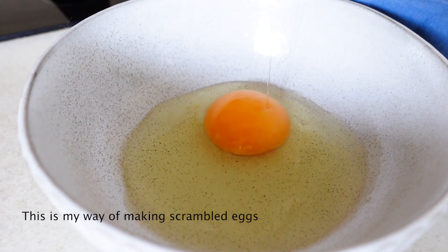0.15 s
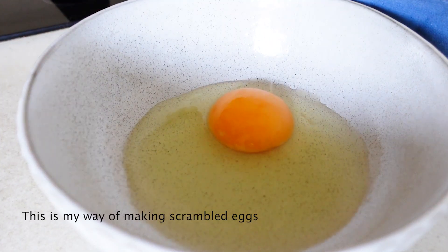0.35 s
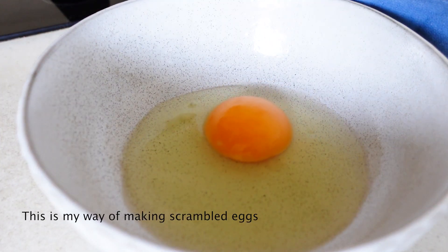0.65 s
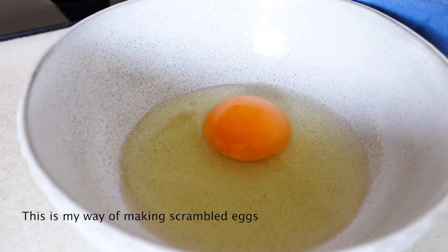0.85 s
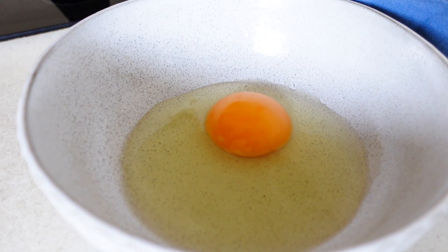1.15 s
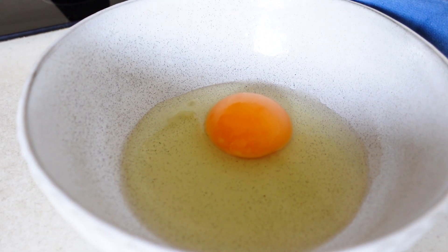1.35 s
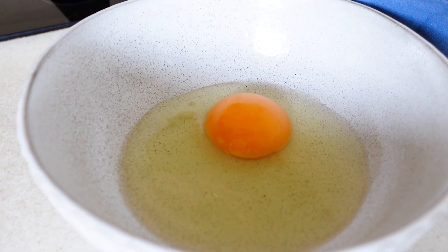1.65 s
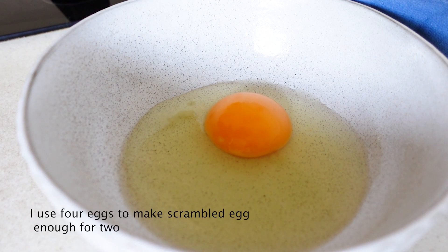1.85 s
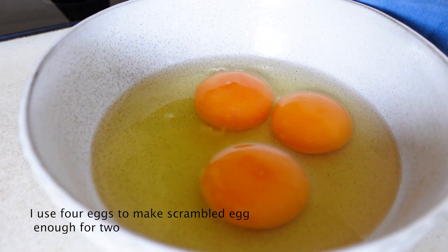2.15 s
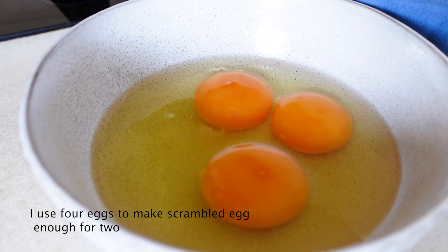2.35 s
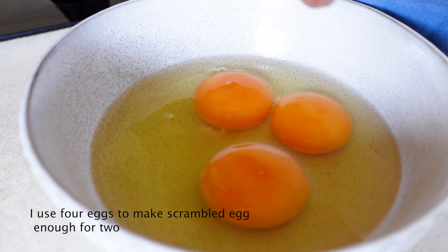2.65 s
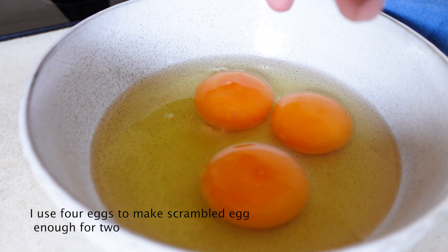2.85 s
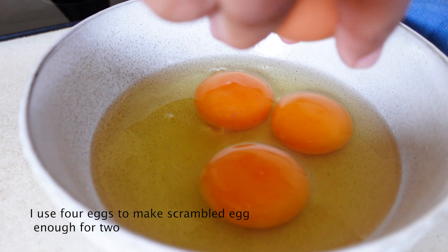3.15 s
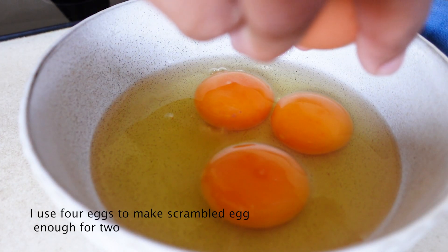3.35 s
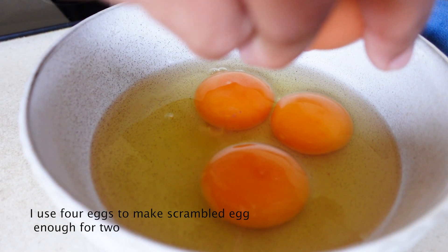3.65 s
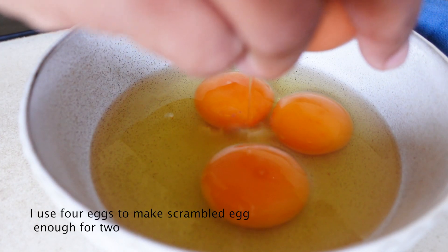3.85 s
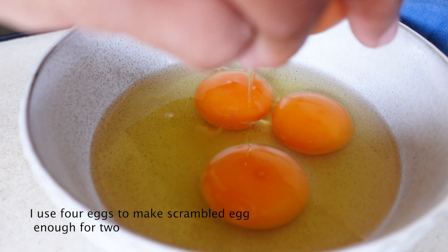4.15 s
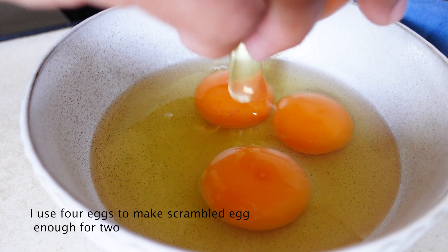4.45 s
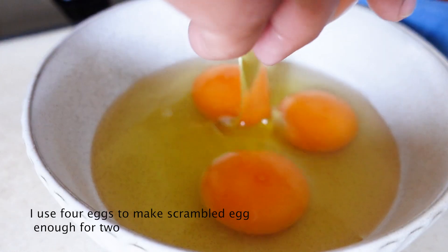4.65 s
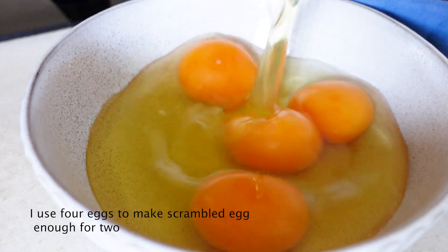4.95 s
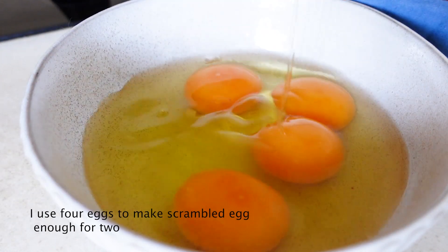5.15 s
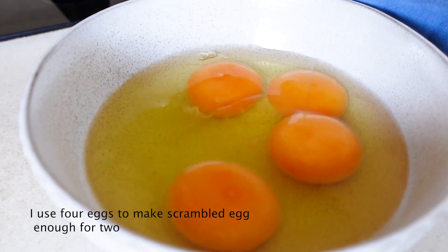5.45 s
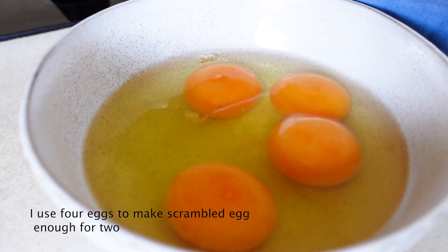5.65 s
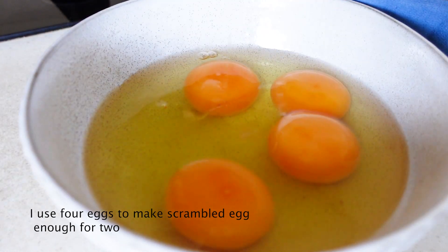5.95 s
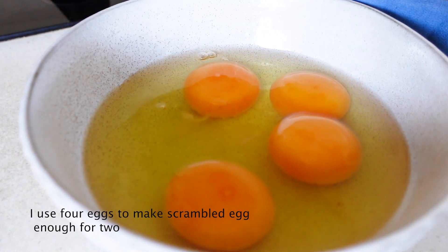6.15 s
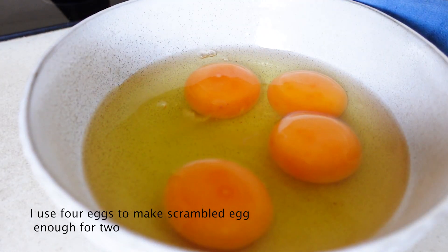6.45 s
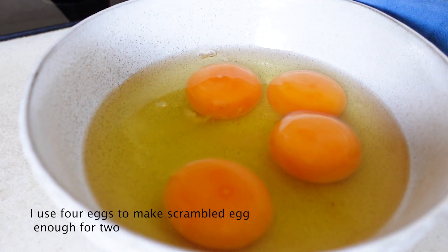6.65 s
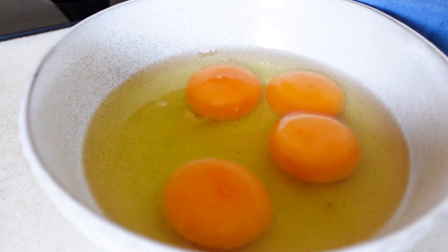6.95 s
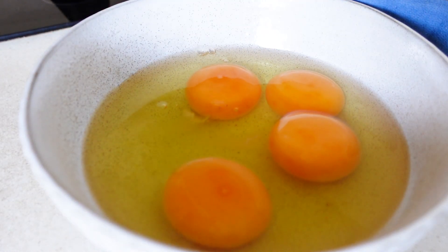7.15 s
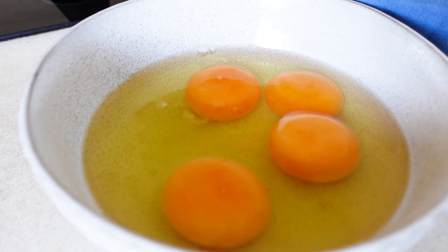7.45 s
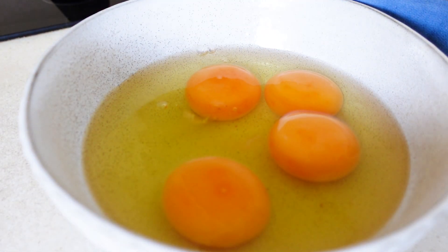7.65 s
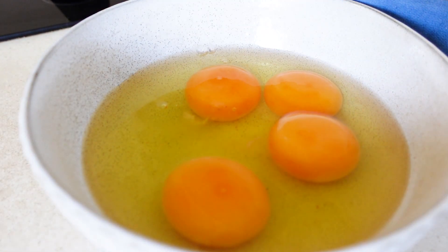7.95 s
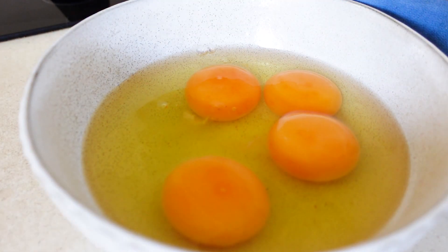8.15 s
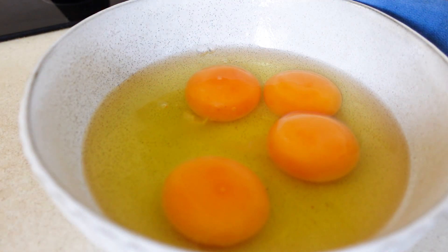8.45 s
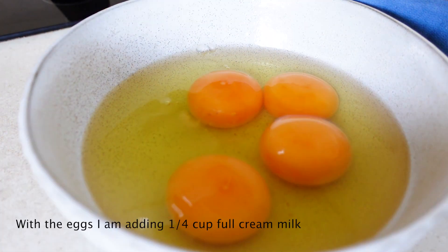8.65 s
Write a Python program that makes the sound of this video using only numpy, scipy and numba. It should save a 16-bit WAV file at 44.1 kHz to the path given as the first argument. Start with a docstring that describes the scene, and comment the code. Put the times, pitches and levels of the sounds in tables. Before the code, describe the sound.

Close eggshell handling in a kitchen with short, light reflections. From 0 s, crisp small cracks and splintery ticks arrive irregularly, growing to strong hollow crunches near 0.85-1.0 s and a denser crackling squeeze around 1.35-1.6 s. From about 1.7 to 3.1 s it is mostly soft rustle and a few faint ticks. A sharp cluster at 3.15 s begins the second bout: scattered snaps and dull taps, a hard crack at 4.1 s, then the loudest, hollowest crunches at 4.35-4.65 s. Smaller cracks follow from 5.0 s, with a bright, brittle flurry at 5.9-6.4 s. After 6.6 s the shell falls nearly silent; hands and sleeves rustle gently, with a dull brush near 8.2 s and a faint tick and swish at 8.44 s. Faint low appliance hum and airy noise run throughout, dropping abruptly much quieter at about 8.6 s.

```python
"""Eggshells cracked by hand

Eggshells are cracked and crushed close by in a kitchen: each crack is a noise burst that rings the hollow,
wall and splinters of the shell. Fine crackle made of tiny grains follows, and dull knocks are short taps.
Smooth noise makes hands and sleeves rustle; steady tones and narrow noise make an appliance hum over airy noise.
Near the end the rustle and the room's reflections stop, and the air and hum drop to a quieter level."""
import sys
import numpy as np
from scipy import signal
from scipy.io import wavfile
from scipy.ndimage import uniform_filter1d
from numba import njit

SR = 44100
rng = np.random.default_rng(int(sys.argv[2]) if len(sys.argv) > 2 else 0)


def dump(signal):
    """Clip the signal to [-1, 1] and save it as 16-bit WAV at the path in sys.argv[1]."""
    limited = np.clip(np.atleast_2d(signal).T, -1, 1)
    pcm = np.round(limited * 32767).astype(np.int16)
    wavfile.write(sys.argv[1], SR, pcm)


def linear_from_db(decibels):
    """Turn decibels (scalar or array-like) into linear amplitude factors; 0 gives 1."""
    return 10 ** (np.asarray(decibels, float) / 20)


N = 388080
TIME = np.arange(N) / SR
QUIET_S = 8.587  # from here on the background is quieter
LATE = TIME > QUIET_S


def rms_one(x):
    """Scale to rms 1."""
    return x / np.sqrt(np.mean(x ** 2) + 1e-20)


def at_hz(points, hz):
    """Read a table of (Hz, value) on a log-frequency axis."""
    table_hz, values = np.transpose(points)
    return np.interp(np.log(hz), np.log(table_hz), values)


def band(x, low_hz, high_hz, order=2):
    """Butterworth band-pass."""
    edges = [low_hz, min(high_hz, .45 * SR)]
    return signal.sosfilt(signal.butter(order, edges, "band", fs=SR, output="sos"), x)


def resonance(x, hz, width_hz):
    """Two-pole resonance with gain 1 on top."""
    r = np.exp(-np.pi * width_hz / SR)
    return signal.lfilter([1 - r * r, 0, r * r - 1], [1, -2 * r * np.cos(2 * np.pi * hz / SR), r * r], x) / 2


@njit
def moving_resonance(x, hz, r, sr):
    """Two-pole resonance whose centre follows hz and whose width follows r."""
    y = np.zeros(len(x))
    for n in range(2, len(x)):
        push = np.sqrt(1 - r[n]) * (x[n] - x[n - 2])
        y[n] = push + 2 * r[n] * np.cos(2 * np.pi * hz[n] / sr) * y[n - 1] - r[n] ** 2 * y[n - 2]
    return y


def grains(shape, per_s, spread_db):
    """Noise chopped into tiny fractures of uneven size that die within milliseconds; rms 1."""
    sizes = linear_from_db(spread_db * np.minimum(rng.exponential(1, shape), 4))
    sizes = sizes * (rng.random(shape) < per_s / SR)
    envelope = signal.lfilter([1], [1, -np.exp(-1 / (0.0019 * SR))], sizes + 1e-18)
    return rms_one(envelope * rng.standard_normal(shape))


def swells(rows):
    """Two gains from rows that each rise to a top and fall again, straight in dB; powers add."""
    power = np.zeros((2, N))
    for top_s, rise_s, fall_s, *db in rows:
        rising, falling = (top_s - TIME) / max(rise_s, 1e-3), (TIME - top_s) / max(fall_s, 1e-3)
        slope_db = -20 * np.where(TIME < top_s, rising, falling)
        power += linear_from_db(2 * np.maximum(slope_db, -99)) * linear_from_db(2 * np.array(db))[:, None]
    return np.sqrt(power)


def place(out, s, sound, db):
    """Mix a short sound in, its loudest 2 ms at the given level."""
    top = np.sqrt(uniform_filter1d(sound ** 2, size=88).max())
    start = round(s * SR)
    out[start:start + len(sound)] += sound * linear_from_db(db) / top


# How alike the noise is in both ears. Each row: frequency in Hz, left-right likeness from 0 to 1.
LIKENESS = [(60, 0.86), (180, 0.95), (550, 0.067), (3000, 0.4), (15000, 0.58)]


def stereo_noise(spectrum, drop):
    """Third-octave noise bands, each with its level, likeness and drop in the quiet end; overall rms 1."""
    out, edges = 0, 25 * 2 ** (np.arange(30) / 3)
    white = rng.standard_normal((2, 2, N))
    for k, (low, high) in enumerate(zip(edges, edges[1:])):
        mid, side = band(white[k % 2], low, high)
        hz = np.sqrt(low * high)
        alike = np.clip(at_hz(LIKENESS, hz), 0, 1)
        gain = linear_from_db(at_hz(spectrum, hz) + LATE * at_hz(drop, hz))
        out = out + gain * (np.sqrt(1 + alike) * mid + np.sqrt(1 - alike) * side * [[1], [-1]])
    return rms_one(out)


# Colour of the air noise. Each row: frequency in Hz, relative level in dB per Hz.
AIR = [(18, -42.5), (30, -25.5), (112, -5.5), (157, -2), (1100, -17.5), (1320, -17.5), (2680, -17.5),
       (3220, -22.5), (6550, -24.5), (16000, -29)]
# How the background changes in the quiet end. Each row: frequency in Hz, change in dB.
QUIET_DB = [(60, -19), (150, -12.5), (600, -25.5), (3000, -25.5), (12000, -28.5)]


def air():
    """Steady broad noise, strongest in the bass, quieter at the end."""
    return linear_from_db(-61.5) * stereo_noise(AIR, QUIET_DB)  # dB rms over the whole scene


# Two steady motor tones that beat: a list of pitches in Hz, then of levels in dB before the quiet end.
MOTORS_HZ = [100.4, 104.67]
MOTORS_DB = [-70, -65.5]
# Wavering appliance tones. Each row: pitch in Hz, width in Hz of one resonance, level in dB before the quiet end.
HUMS = [(83, 14, -75), (172.7, 20, -76), (2699, 5.6, -78), (2734, 5.3, -80)]


def hum():
    """Two steady motor tones, and narrow wavering ones: noise passed twice through a resonance."""
    out = 0
    for hz, db in zip(MOTORS_HZ, MOTORS_DB):
        tone = np.sin(2 * np.pi * hz * TIME)
        out = out + rms_one(tone) * linear_from_db(db + LATE * at_hz(QUIET_DB, hz))
    for hz, width_hz, db in HUMS:
        noise = rng.standard_normal(N + SR)
        tone = resonance(resonance(noise, hz, width_hz), hz, width_hz)[SR:]  # skip the build-up
        out = out + rms_one(tone) * linear_from_db(db + LATE * at_hz(QUIET_DB, hz))
    return out


# Each new grip gives the open shell another hollow and wall ring. Each row: start in seconds, hollow pitch in Hz,
# hollow width in Hz, wall ring pitch in Hz, gain of the wall ring in dB.
GRIPS = [(0, 2150, 320, 5870, -2), (.65, 1620, 220, 3400, -6), (.82, 1700, 300, 5200, -8),
         (.97, 1870, 450, 6200, -5), (1.15, 2250, 260, 5770, -2), (2.201, 2720, 300, 4500, -8.5),
         (3.351, 2750, 250, 4700, -4), (3.45, 1650, 400, 2750, 0), (3.5, 3040, 160, 5040, -8),
         (3.86, 2850, 220, 5000, -6), (4.05, 2500, 350, 4700, -8), (4.34, 2250, 450, 3700, -4),
         (4.39, 2010, 280, 3780, -2), (4.57, 1560, 260, 3500, 2), (4.75, 1450, 150, 3450, 3),
         (4.95, 1650, 300, 3520, 10), (5.021, 2120, 350, 3500, -7.5), (5.3, 1950, 500, 3500, -9),
         (6.04, 2800, 300, 4500, -6.5), (6.095, 2300, 400, 3700, -4), (6.351, 2030, 280, 5050, -2),
         (6.43, 1700, 300, 2500, -6)]


def grip(s):
    """Hollow Hz, its width Hz, wall ring Hz and wall ring dB of the grip held at these times."""
    start, *columns = np.transpose(GRIPS)
    return np.array(columns)[:, np.clip(np.searchsorted(start, s) - 1, 0, None)]


# Every crack of the shell. Each row: start in seconds, then the levels in dB of shell wall, hollow and splinters
# (loudest 2 ms, before the low cut and panning).
CRACKS = [(0.0285, -39, -32, -40), (0.0328, -38, -35, -27.5), (0.0641, -35, -33.5, -19.5),
          (0.0948, -49, -61, -33), (0.0992, -36.5, -33, -34.5), (0.1445, -49, -47.5, -38.5),
          (0.181, -35, -32.5, -32.5), (0.3037, -49, -53, -36.5), (0.324, -76.5, -51.5, -38),
          (0.3266, -49.5, -62, -45), (0.5416, -54, -46.5, -49), (0.56, -40, -44, -31.5),
          (0.5674, -43, -37.5, -33), (0.584, -56, -55, -46), (0.7128, -49, -35.5, -33.5),
          (0.729, -41.5, -39, -45.0), (0.754, -53.5, -41.5, -49), (0.7621, -54, -60.0, -41),
          (0.8272, -52, -46, -52.0), (0.8517, -33, -29.0, -29), (0.8662, -25, -25, -24.5),
          (0.9795, -29.5, -22.5, -27), (0.9856, -34, -26, -22.5), (0.992, -29, -40, -29),
          (1.1547, -53, -46, -61), (1.3412, -36.5, -30, -27.5), (1.363, -57.0, -34, -50.5),
          (1.383, -55, -35.5, -44), (1.4093, -38, -38, -35), (1.4147, -31.5, -38, -43),
          (1.4817, -60, -26.5, -44), (1.4987, -52, -29, -42), (1.5023, -38, -29.5, -28),
          (1.5744, -35, -37.5, -31.5), (1.6006, -34.5, -30, -28.5), (2.317, -58.5, -77.0, -51),
          (2.3465, -46, -57.5, -43.5), (2.9197, -57, -77, -42.5), (3.0039, -53, -63, -44),
          (3.0577, -51, -62, -50), (3.1438, -43, -49, -42), (3.157, -27, -32.5, -27.5),
          (3.1672, -35, -41, -27.5), (3.1726, -35, -42, -23.5), (3.181, -37, -34.5, -32),
          (3.1911, -28.5, -33.5, -32.5), (3.206, -50, -56, -32), (3.382, -39, -65, -37),
          (3.4136, -41.5, -43.5, -48), (3.4751, -47.5, -46, -46), (3.5125, -41, -50.0, -38),
          (3.684, -59, -60, -48), (3.7728, -46, -41.5, -31.5), (3.8067, -36, -37.5, -36),
          (3.8313, -49.0, -44.5, -40), (3.858, -51.0, -48.5, -44), (3.8688, -48, -43.5, -37),
          (3.8873, -29.5, -32.5, -28.5), (3.9309, -41, -44.5, -44), (3.9751, -45, -57.0, -42.5),
          (4.0818, -31, -34, -30), (4.0888, -24.5, -27, -18), (4.1268, -45, -43, -38),
          (4.2214, -45, -45, -43), (4.232, -39, -40, -36.5), (4.32, -33, -37, -35), (4.3647, -41, -40, -35),
          (4.371, -22.5, -20.0, -22), (4.38, -21, -20, -24), (4.395, -22, -26.5, -36),
          (4.4021, -20.5, -27, -23), (4.4304, -31, -35, -46), (4.5467, -34, -50, -37.5),
          (4.5915, -20.5, -29, -19.5), (4.6127, -38, -57, -44), (4.628, -32, -39, -37),
          (4.644, -16.5, -30.5, -21.5), (4.682, -43, -37, -44), (4.6944, -48.0, -40, -46.0),
          (4.7275, -43, -30.5, -57), (4.7806, -27.5, -28.5, -31.5), (4.816, -31.5, -34.5, -44),
          (4.989, -50, -55, -57.5), (5.0041, -27, -41.5, -32.5), (5.0351, -33.5, -37.5, -20.5),
          (5.0437, -52, -60, -49), (5.0986, -49.0, -63, -32.5), (5.1454, -50, -60, -41),
          (5.2177, -48, -46, -41), (5.2326, -46, -41, -36.0), (5.2571, -44, -36.5, -30.5),
          (5.2671, -37, -39, -28), (5.3834, -48, -47, -42), (5.4621, -54, -51, -44.5),
          (5.5267, -61.5, -48, -49.5), (5.6945, -59, -52, -41), (5.6991, -59, -46, -45),
          (5.7488, -55, -52.5, -47), (5.8431, -45, -40.5, -39.5), (5.8679, -55, -66, -45),
          (5.8921, -32.5, -35, -25.5), (5.9386, -39, -46, -28.5), (5.9564, -26.5, -30.5, -21),
          (5.9656, -36, -40, -24), (5.9848, -31, -46, -27.5), (6.0081, -41, -48.0, -34),
          (6.0613, -36.5, -41, -23.5), (6.077, -34.5, -37, -23.5), (6.104, -40, -48, -29.0),
          (6.1094, -53.0, -57.0, -43), (6.131, -50, -43, -37), (6.1515, -39, -41, -38),
          (6.1614, -41, -43.0, -21.5), (6.1851, -42.0, -55, -37.5), (6.1949, -42, -41, -23.5),
          (6.2113, -21, -28.5, -17.5), (6.2446, -46.0, -68, -30.5), (6.2564, -50.0, -66, -43),
          (6.3702, -40, -57, -38), (6.3803, -30, -26.5, -26), (6.3878, -30, -26.5, -27),
          (6.4052, -32.5, -43, -28.5), (6.4241, -37.5, -57, -32), (6.5382, -48.5, -39, -54),
          (6.5434, -54, -42, -55), (6.5675, -45, -61, -56), (6.802, -62, -55.5, -64),
          (8.442, -54, -75, -39)]


def cracks():
    """A sharp fracture and the crunch running on behind it ring the hollow and wall, over broad splintering."""
    burst_s, crunch_s, crunch_db = 0.00077, 0.0043, -11.5  # decay times, crunch beside fracture
    hollow_scatter = .02  # share by which one crack strays from the hollow of its grip
    out, t = np.zeros(N), np.arange(3500) / SR
    shape = (len(CRACKS), len(t))
    bursts = rng.standard_normal(shape) * np.exp(-t / burst_s) * np.clip(t / 0.00044, 0, 1)
    bursts += linear_from_db(crunch_db) * grains(shape, per_s=1000, spread_db=3.0) * np.exp(-t / crunch_s)
    splinter_hz = 5800 + 4000 * rng.random((len(CRACKS), 4))
    pitches, widths, rings, rings_db = grip(np.transpose(CRACKS)[0])
    pitches = pitches * (1 + hollow_scatter * rng.standard_normal(len(CRACKS)))
    for row, hz, width_hz, ring_hz, ring_db, burst, pieces in zip(
            CRACKS, pitches, widths, rings, rings_db, bursts, splinter_hz):
        s, wall_db, hollow_db, splinter_db = row
        hollow = resonance(burst, hz, width_hz) + linear_from_db(-33) * burst
        wall = band(burst, 3200, 6200, order=3) + linear_from_db(ring_db) * resonance(burst, ring_hz, 260)
        splinter = burst + sum(resonance(burst, piece, 700) for piece in pieces)
        place(out, s, band(hollow, 0.69 * hz, 3940, order=3), hollow_db)
        place(out, s, wall, wall_db)
        place(out, s, band(splinter, 5800, 15500, order=3), splinter_db)
    return out


# How long the room rings. Each row: frequency in Hz, seconds to fall by 60 dB.
ROOM_T60_S = [(1500, 0.43), (10000, 0.25)]


def kitchen(x):
    """Dense reflections: noise that dies band by band, partly different for each ear."""
    t, tail = np.arange(SR // 2) / SR, 0
    edges = 400 * 2 ** np.arange(0, 6.1)
    for low, high in zip(edges, edges[1:]):
        decay = linear_from_db(-60 * t / at_hz(ROOM_T60_S, np.sqrt(low * high)))
        side_share = (high / 6400) ** 0.41  # ears differ more in the treble
        tail = tail + band(rng.standard_normal((2, len(t))), low, high) * decay * [[1], [side_share]]
    mid, side = tail * np.clip(t / 0.0022, 0, 1)
    tail = mid + 0.63 * side * [[1], [-1]]
    tail = tail / np.sqrt(np.sum(tail ** 2) / 2)
    return signal.fftconvolve(x[None], tail, axes=1)[:, :N]


def aftermath():
    """Crackle powers (hollow, bright) after the cracks: a quick and a slow fading."""
    after_db = [[-36.5], [-38]]  # hollow and bright start of the quick fading after a -30 dB crack
    settle_s, linger_s, linger_db = 0.0067, 0.087, -25  # quick and slow decay, slow beside quick
    s, _, hollow_db, splinter_db = np.transpose(CRACKS)
    power = np.full((2, N), 1e-18)
    swing_db = np.array([hollow_db, splinter_db]) + 30
    power[:, (s * SR).astype(int)] = linear_from_db(2 * (swing_db + after_db))

    def fade(x, seconds):
        return signal.lfilter([1], [1, -np.exp(-2 / (seconds * SR))], x)

    return fade(power, settle_s) + linear_from_db(2 * linger_db) * fade(power, linger_s)


# Fingers keep working the shell. Each row: loudest moment in seconds, rise and fall in seconds per 20 dB,
# hollow gain in dB, bright gain in dB (before the low cut and panning).
KNEADING = [(.6, 0.098, 0.16, -60.5, -71), (.66, 0.022, .04, -62, -51.5), (.84, 0.037, 0.066, -43, -47.5),
            (1.4, 0.057, 0.037, -35.5, -38), (2.36, 0.19, 0.2, -84, -53), (3.45, 1, 0.26, -82, -60),
            (3.71, 0.03, 0.28, -59.5, -64), (3.82, 0.037, 0.043, -44.5, -40.5),
            (3.96, 0.12, 0.45, -58.5, -55.5), (4.36, 0.06, 0.023, -46, -48), (4.63, 0.063, 0.2, -36, -42.5),
            (4.86, 0.49, 0.04, -53, -61), (5.35, 0.77, .35, -61, -57), (5.82, 0.039, 0.12, -58, -55.5),
            (6.1, 0.24, 0.3, -51, -44.5), (6.37, 0.062, .05, -52, -43), (6.55, 0.09, 0.11, -52.5, -51),
            (7.12, 0.13, 0.063, -61, -63)]


def crackle():
    """Tiny fractures at random ring the same hollow as the cracks around them."""
    hollow_gain, bright_gain = np.sqrt(aftermath() + swells(KNEADING) ** 2)
    hz, width_hz, ring_hz, ring_db = grip(TIME)
    fine = grains(N, per_s=640, spread_db=4.5)
    r = np.exp(-np.pi * width_hz / SR)
    hollow = rms_one(moving_resonance(fine, hz, r, SR))
    overtone = rms_one(moving_resonance(fine, ring_hz, r * r, SR))  # twice as wide
    broad = rms_one(band(fine, 1600, 3900))
    body = rms_one(hollow + linear_from_db(-3 + ring_db) * overtone + linear_from_db(-2.5) * broad)
    bright = rms_one(band(fine, 4800, 12060))
    return hollow_gain * body + bright_gain * bright


# Strokes of sleeve and hands. Each row: loudest moment in seconds, rise and fall in seconds per 20 dB,
# dull gain in dB, bright gain in dB before the cloth catches.
RUSTLE = [(2.13, 1.8, 0.067, -63, -60.5), (7.07, 0.21, 0.17, -66.5, -59.5), (7.5, 2.4, 6.2, -70, -62.5),
          (7.8, 0.3, 0.6, -83, -55), (8.21, 0.11, 0.2, -48.5, -65.5), (8.445, 0.028, 0.2, -76, -51.5),
          (8.56, 1.05, 0.23, -65, -59)]
# Colour of the bright rustle. Each row: frequency in Hz, relative level in dB per Hz.
RUSTLE_BRIGHT = [(1530, -8.5), (2600, -1), (4350, 5), (9280, -0.5), (15900, -13.5)]


def rustle():
    """Cloth and skin sliding: smooth noise in a dull and a bright part, silent in the quiet end."""
    dull_gain, bright_gain = swells(RUSTLE) * (TIME < QUIET_S)
    catches = np.abs(band(grains(N, per_s=54, spread_db=3.5), 12, 112.6))  # cloth catches
    bright_gain = bright_gain * (1 + 0.25 * catches)
    shared, own = rng.standard_normal(N), rng.standard_normal((2, N))
    dull = rms_one(band(shared + 3.6 * own, 390, 3830, order=1))
    bright = stereo_noise(RUSTLE_BRIGHT, [(1, 0), (SR, 0)])  # no drop
    return dull_gain * dull + bright_gain * bright


# Dull knocks of shell against a surface. Each row: start in seconds, level in dB (loudest 2 ms, before panning).
KNOCKS = [(0.867, -44.5), (0.979, -41.5), (1.502, -47), (3.157, -48.5), (3.382, -45), (3.415, -47),
          (3.475, -40), (3.512, -50), (3.806, -49), (3.889, -47), (4.089, -40), (5.004, -42), (5.987, -45),
          (6.38, -41.5)]


def knocks():
    """A soft contact gives a short, dull, even tap: a click and a little noise, without bass or treble."""
    out, t = np.zeros(N), np.arange(2000) / SR
    noise = rng.standard_normal((len(KNOCKS), len(t)))
    bursts = 0.15 * noise * np.exp(-t / 0.005) + (t == 0)
    for (s, db), burst in zip(KNOCKS, bursts):
        place(out, s, band(burst, 500, 1700), db)
    return out


# Place of the hands. Each row: time in seconds, left minus right in dB.
HANDS = [(0.0, -1), (3.36, -2.5), (8.8, 1.5)]


def scene():
    """Shell sounds placed with the hands, their room, and the background."""
    # a shell this small radiates little below 1256 Hz
    low_cut = signal.butter(10, 1256, "high", fs=SR, output="sos")
    shell = signal.sosfilt(low_cut, cracks() + crackle()) + knocks()
    hand_s, left_minus_right_db = np.transpose(HANDS)
    pan_db = np.interp(TIME, hand_s, left_minus_right_db)
    near = shell * linear_from_db(pan_db * [[.5], [-.5]])
    room = linear_from_db(-10) * kitchen(shell) * (TIME < QUIET_S)
    return near + room + rustle() + hum() + air()


def roll_off(x):
    """The treble ends steeply here."""
    return signal.sosfilt(signal.butter(12, 17150, fs=SR, output="sos"), x)


def record(dry):
    """A steep low-pass at 16500 Hz removes the highest treble of the mix."""
    cut = signal.sosfilt(signal.butter(8, 16500, fs=SR, output="sos"), dry)
    return roll_off(cut)


dry = scene()
out = record(dry)
dump(out)
```